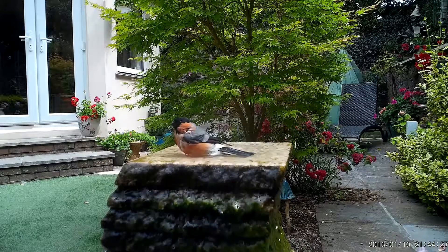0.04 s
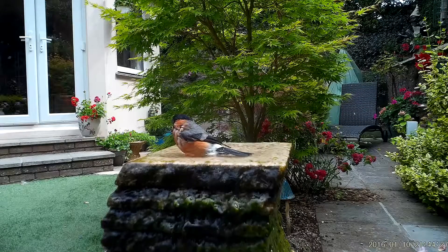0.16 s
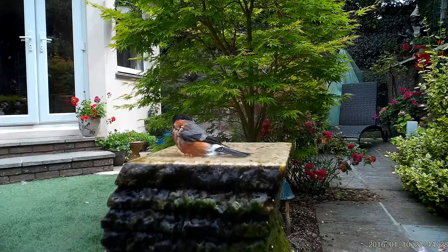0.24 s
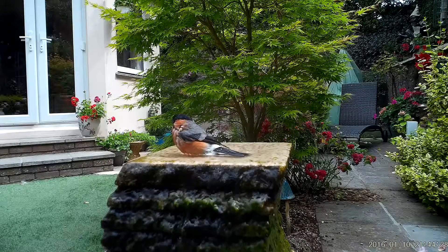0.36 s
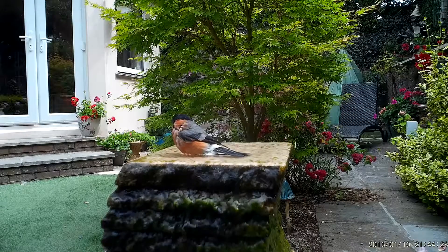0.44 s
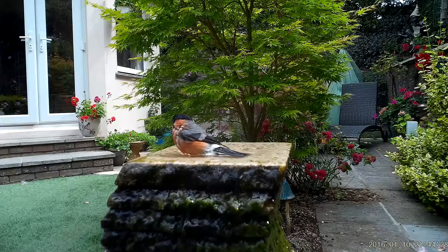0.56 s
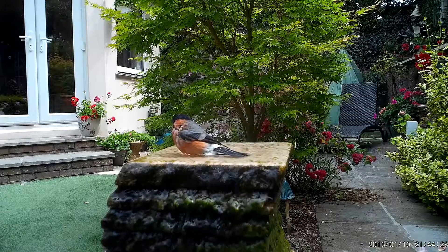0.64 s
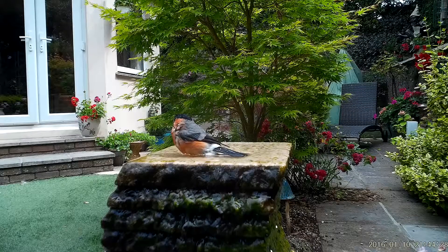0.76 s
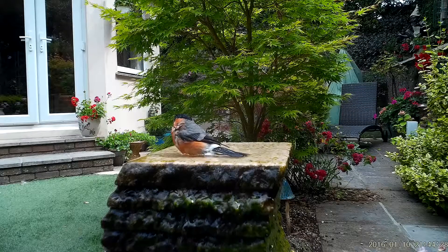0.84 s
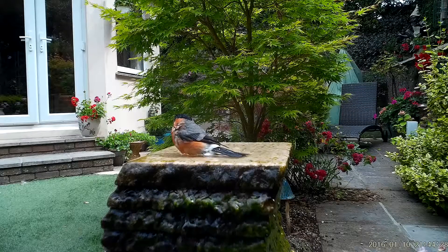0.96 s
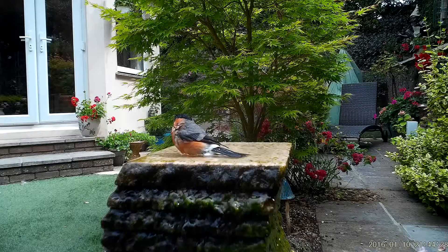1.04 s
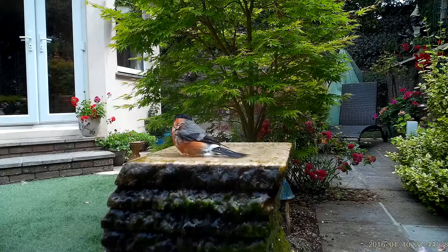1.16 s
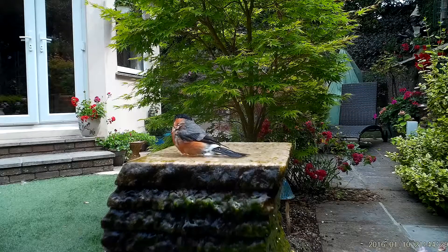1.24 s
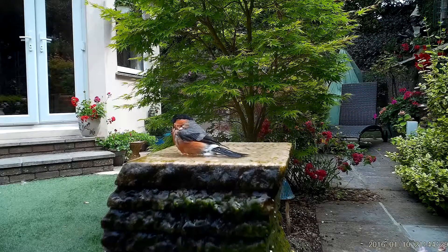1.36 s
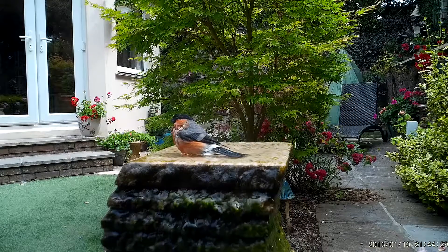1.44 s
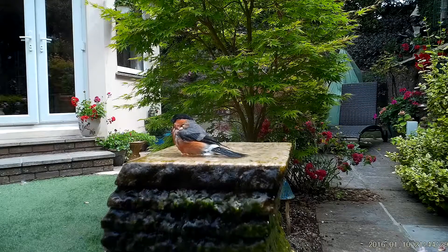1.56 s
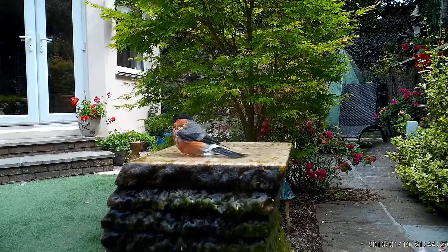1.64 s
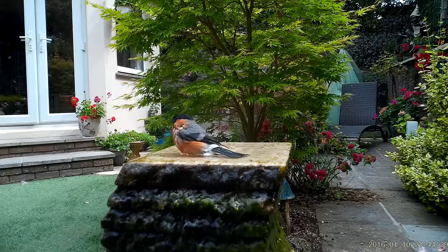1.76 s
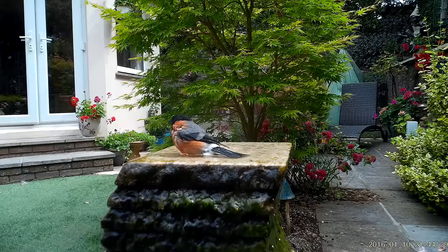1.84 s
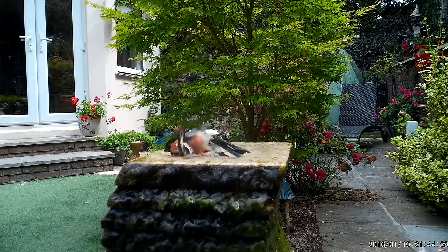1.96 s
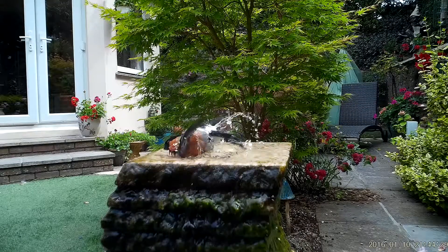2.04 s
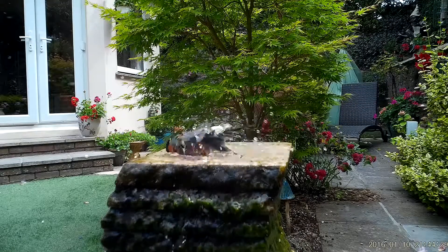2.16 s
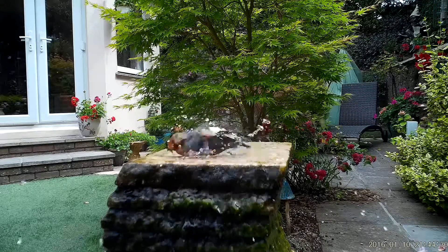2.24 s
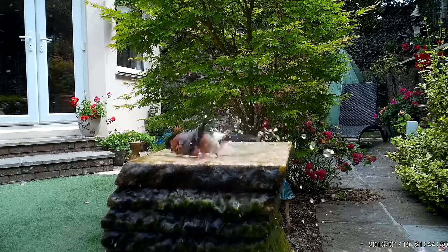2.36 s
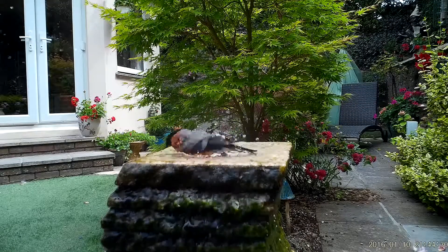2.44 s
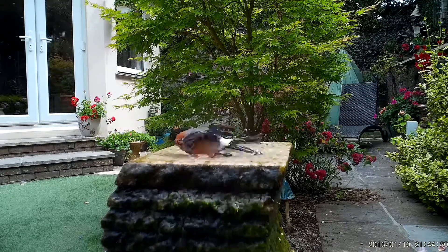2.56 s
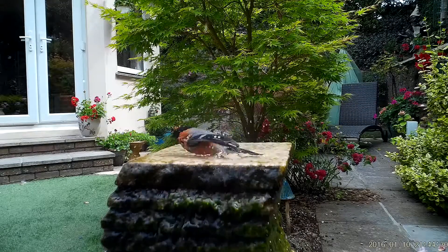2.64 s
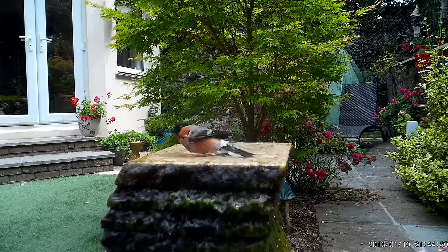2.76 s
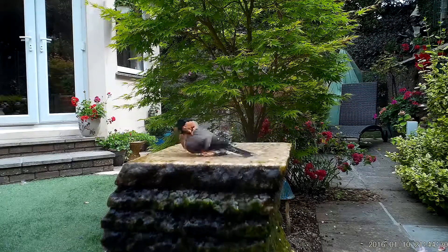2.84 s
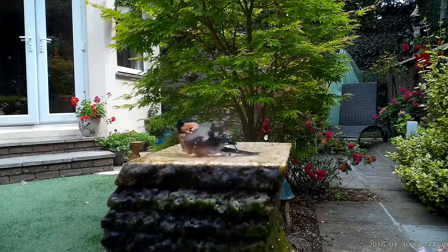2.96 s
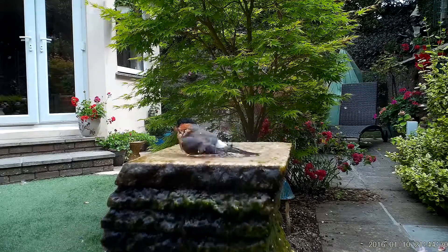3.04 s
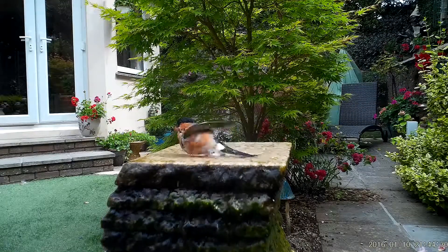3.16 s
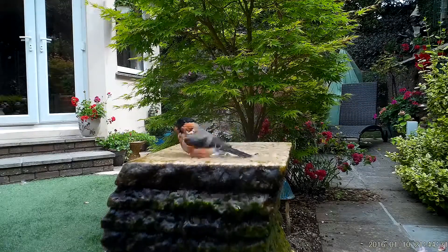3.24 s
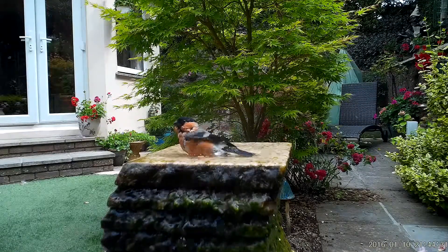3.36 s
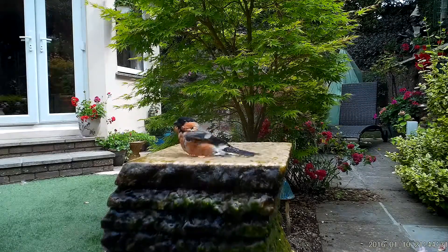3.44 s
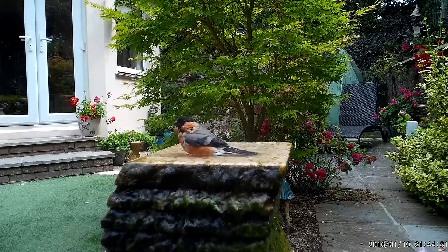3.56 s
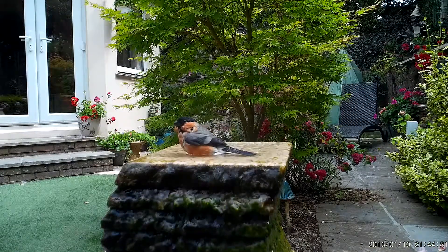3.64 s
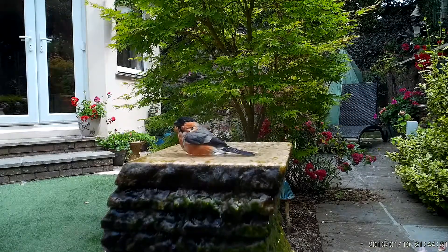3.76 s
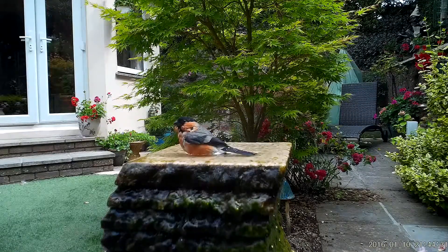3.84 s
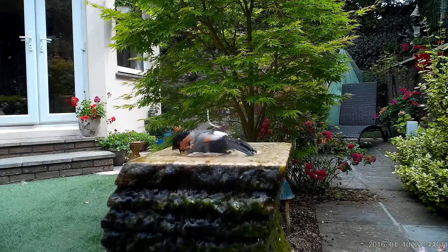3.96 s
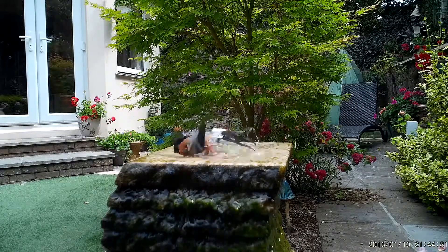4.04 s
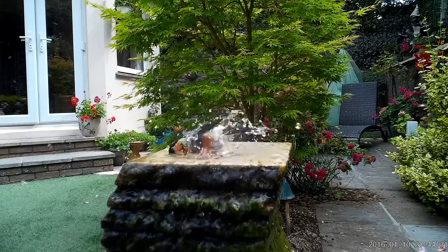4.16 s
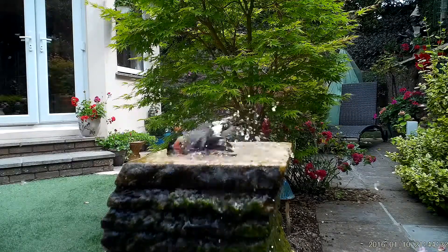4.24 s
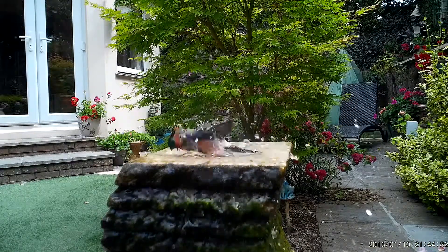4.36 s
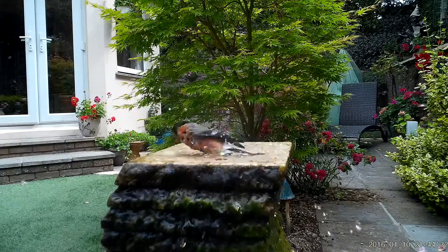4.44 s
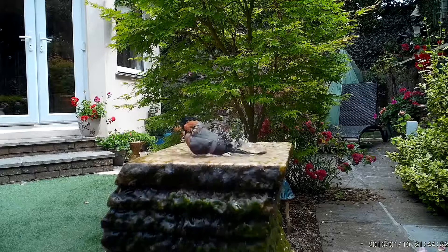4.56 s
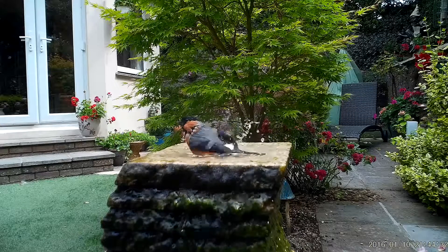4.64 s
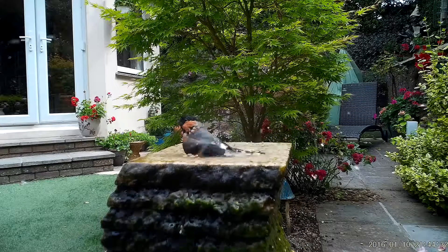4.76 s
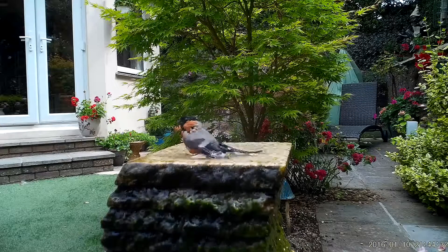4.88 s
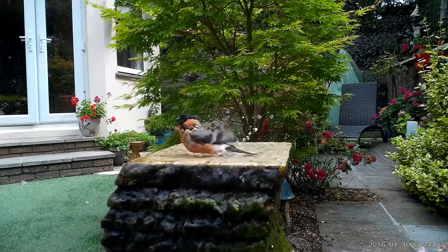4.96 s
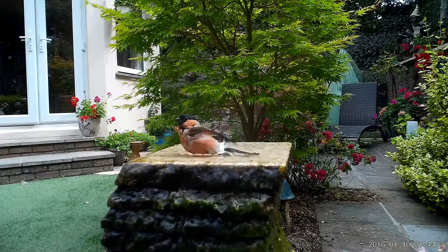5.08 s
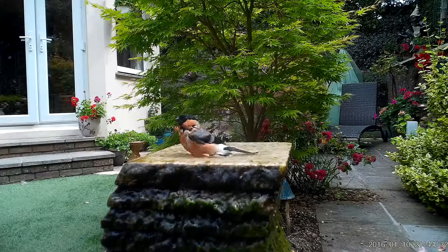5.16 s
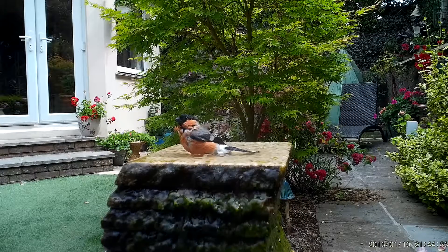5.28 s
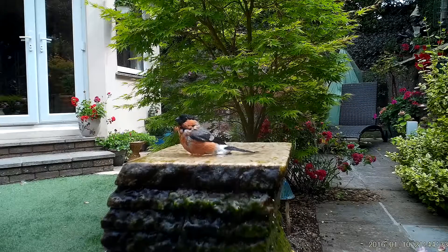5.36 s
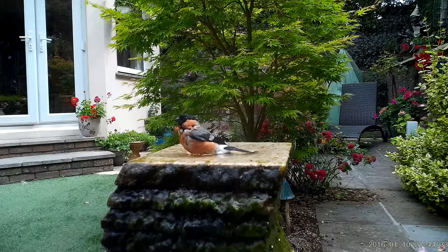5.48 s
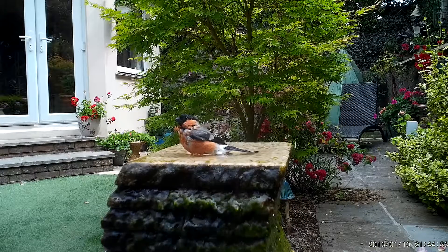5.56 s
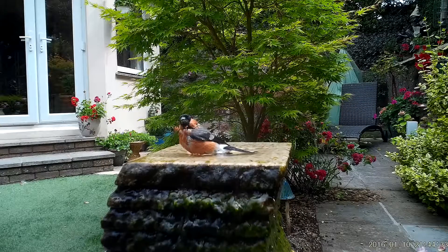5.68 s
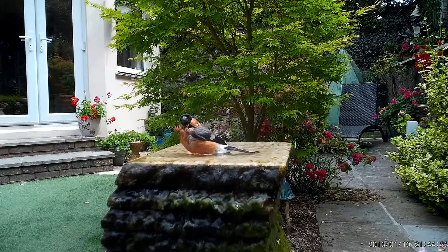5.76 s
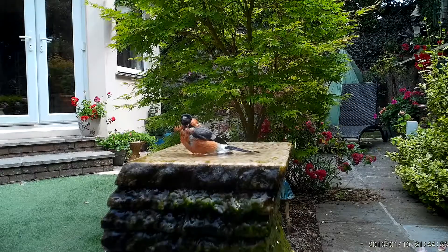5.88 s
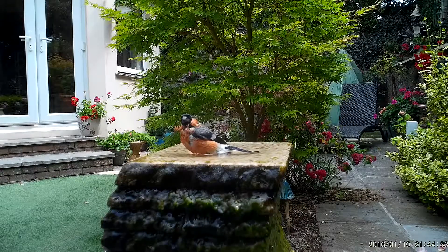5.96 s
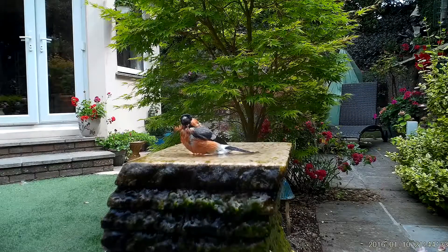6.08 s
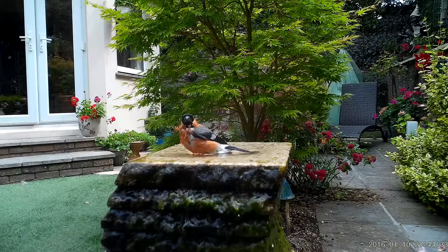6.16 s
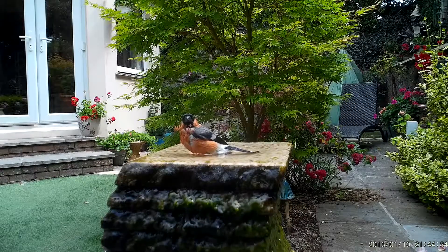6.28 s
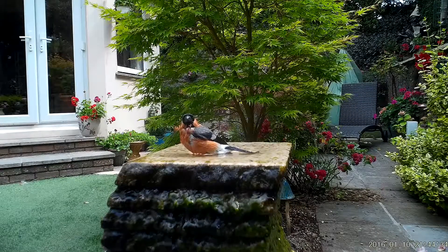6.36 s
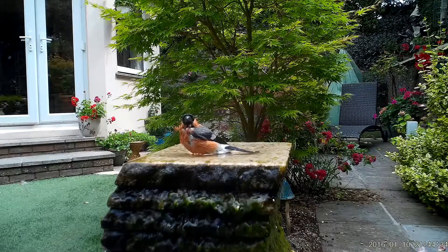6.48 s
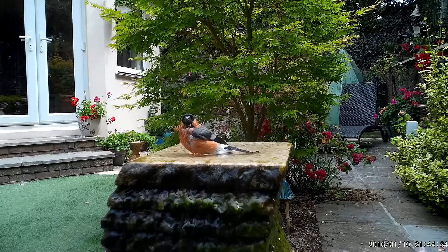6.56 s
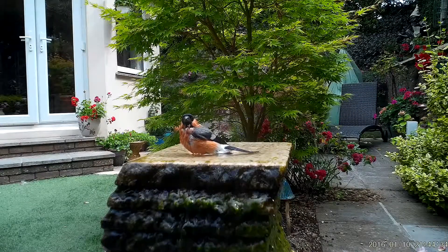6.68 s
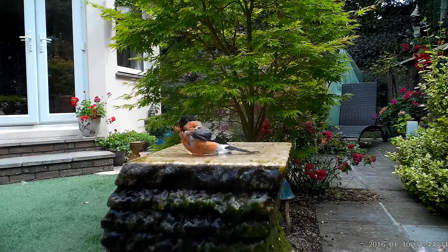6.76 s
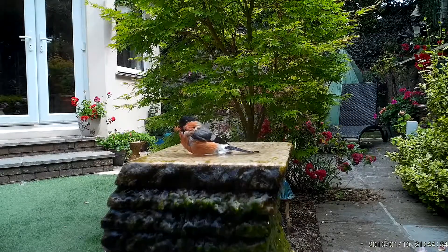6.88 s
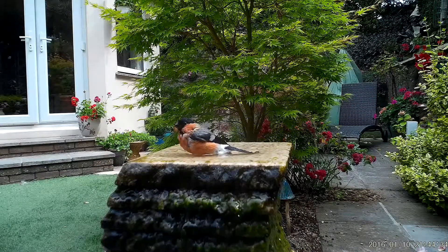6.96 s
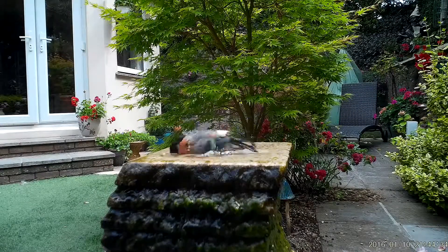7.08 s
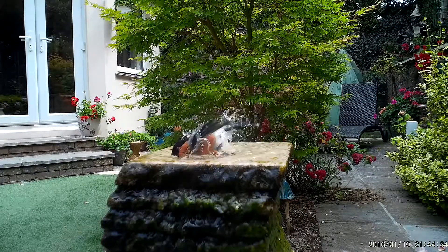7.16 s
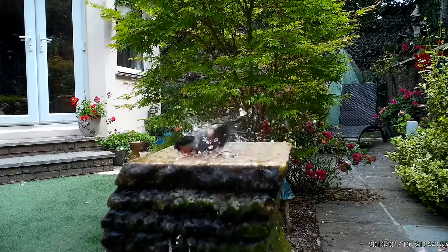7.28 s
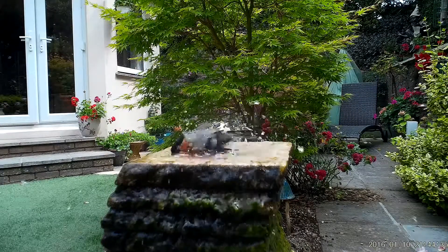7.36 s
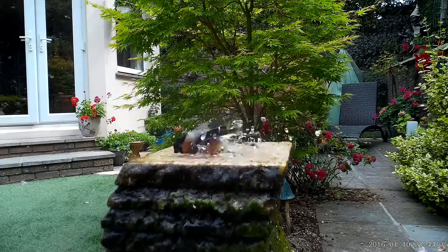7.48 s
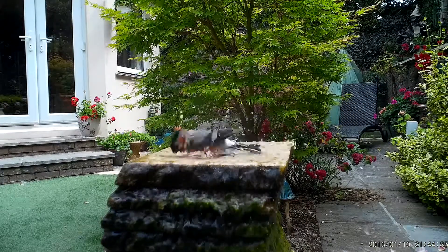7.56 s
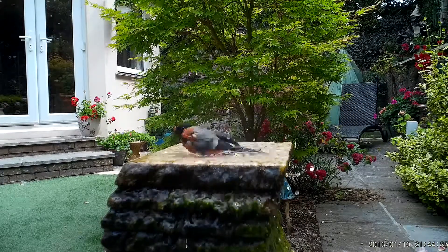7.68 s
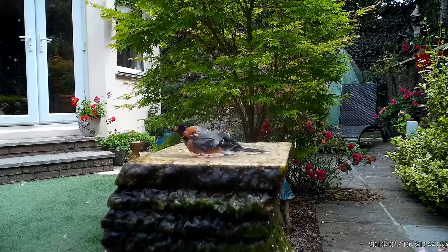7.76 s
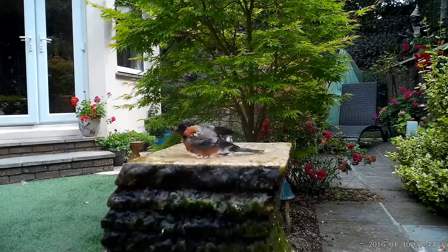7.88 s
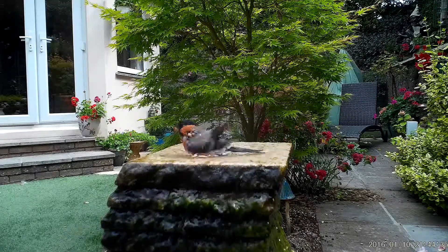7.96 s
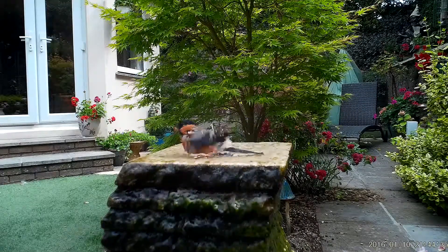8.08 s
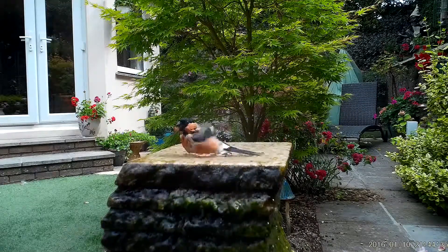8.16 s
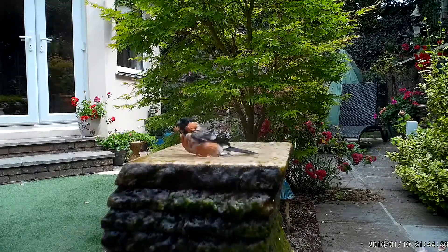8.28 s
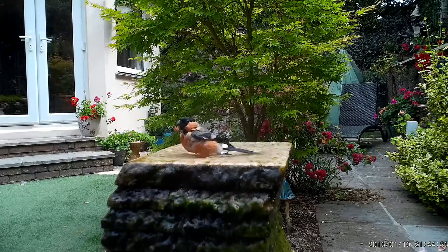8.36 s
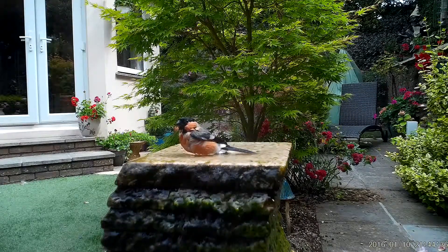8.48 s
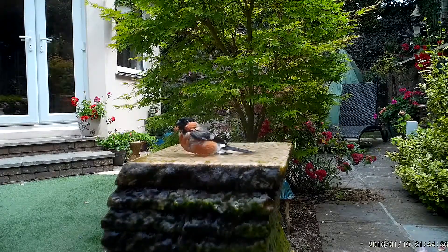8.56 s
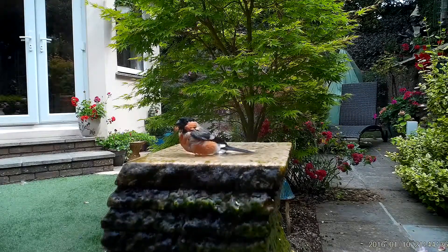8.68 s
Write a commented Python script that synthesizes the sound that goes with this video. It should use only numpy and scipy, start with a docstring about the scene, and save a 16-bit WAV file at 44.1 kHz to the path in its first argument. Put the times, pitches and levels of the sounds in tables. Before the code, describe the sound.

A small bird splashes in bouts in a shallow stone birdbath, drops plinking and trickling, while another bird whistles early on in a quiet garden.

```python
"""A finch bathes on a stone fountain in a garden. From the start drops tick and chirp (filtered clicks for
impacts, gliding damped sines for bubbles), and a wren-like song of wavering whistles runs to about 3 s.
Thin high calls come near 1.4 and 3.8 s. The water is thick while the wings beat, most of all near 2.5, 4.7 and
7.5 s, with a big splat at 7.7 s, and sparse while the overflow trickles. Hollows in the fountain ring as slow
damped sines. Shaped noise makes the hum of the town and a breeze all through."""
import sys
import numpy as np
from scipy import signal
from scipy.fft import rfft, irfft
from scipy.io import wavfile
from scipy.ndimage import uniform_filter1d

SR = 44100
rng = np.random.default_rng(int(sys.argv[2]) if len(sys.argv) > 2 else 0)


def dump(signal):
    """Clip the signal to [-1, 1] and save it as 16-bit WAV at the path in sys.argv[1]."""
    limited = np.clip(np.atleast_2d(signal).T, -1, 1)
    pcm = np.round(limited * 32767).astype(np.int16)
    wavfile.write(sys.argv[1], SR, pcm)


N = 384552

# The clearest drops, each a bubble and the tick of its impact:
# (time [s], bubble peak [dB], bubble pitch [Hz], time to fade by 60 dB [ms], tick level before a boost [dB])
CLEAR_DROPS = [(0.1137, -29, 2960, 29, -51.0), (0.1661, -15.5, 5750, 6.2, -47.0),
               (0.1883, -11.5, 6300, 2.7, -30.5), (0.26, -17, 4730, 4.2, -50.0),
               (0.3549, -27, 3500, 13.0, -53.0), (0.4156, -17.5, 4060, 11, -47),
               (0.429, -16, 4700, 6.1, -50), (0.4974, -28, 6000, 14, -56.0),
               (0.5197, -21, 5750, 4.3, -50.0), (0.534, -33, 2810, 27, -59.0),
               (0.5869, -20, 6720, 8.1, -38), (0.6555, -25, 2050, 14, -39), (0.8518, -22.5, 6720, 9.3, -41),
               (1.1948, -16.5, 3890, 17, -45), (1.2489, -30, 3070, 19, -50),
               (1.2579, -19.5, 6850, 3.7, -43), (1.2723, -23.5, 3400, 17, -36),
               (1.3913, -22.5, 2970, 16.0, -47.5), (1.4547, -22.5, 6260, 11.0, -48.0),
               (1.4656, -21, 4420, 11, -49.0), (1.4916, -15.5, 5850, 7.0, -48),
               (1.574, -20.5, 3760, 13, -46.5), (1.5851, -27, 3700, 13, -55.0),
               (1.6987, -24, 2800, 10.2, -49.5), (1.7645, -20, 7900, 4.8, -29), (1.9575, -16, 6770, 7, -31),
               (2.1581, -26, 3590, 13.0, -46.5), (2.178, -18.5, 6300, 9.2, -44),
               (2.221, -14.5, 5300, 6.2, -45), (2.2402, -13.0, 3960, 6.6, -42.0),
               (2.2793, -28.0, 1880, 29.0, -38), (2.2876, -11, 5320, 3.5, -35),
               (2.3055, -22.5, 2250, 19, -45), (2.319, -18.5, 2950, 18, -29),
               (2.3688, -15.5, 6500, 5.5, -30), (2.4158, -14, 5980, 3.6, -41.5),
               (2.4554, -22, 2250, 16, -46.0), (2.4675, -23, 3480, 13.0, -52.5),
               (2.4696, -22, 7270, 5.5, -41), (2.4829, -22.5, 2080, 30, -43.5),
               (2.5188, -14.5, 5400, 4.3, -38.5), (2.5487, -11.5, 4470, 5.1, -42),
               (2.5786, -34, 1780, 30.0, -51.0), (2.5926, -25, 2900, 17.0, -51.5),
               (2.6245, -21, 2410, 19, -49.0), (2.698, -3.5, 5330, 3, -27.5), (2.7434, -12, 4040, 6.1, -40),
               (2.7812, -16, 3590, 14, -28), (2.8568, -10, 7040, 2.7, -30),
               (2.8687, -19.5, 3700, 7.4, -45.0), (2.8777, -17, 6720, 3.3, -34.5),
               (2.8859, -28.5, 1880, 26, -47.5), (2.9009, -12.5, 6220, 3.6, -26),
               (2.9329, -18, 6720, 6.8, -47), (2.9605, -29, 2480, 23, -49.0),
               (3.0163, -28.5, 2130, 22, -52.0), (3.098, -13.5, 6600, 2.7, -26),
               (3.1077, -16.5, 6500, 7.5, -40), (3.1354, -14.5, 4900, 4.6, -36),
               (3.139, -28.5, 2120, 25.0, -42.5), (3.2037, -18.5, 5200, 4.4, -26),
               (3.2835, -29.5, 2040, 26.0, -58.0), (3.3051, -23.5, 7280, 3, -35),
               (3.3596, -26, 4700, 5.6, -42), (3.4177, -26, 4370, 10.0, -53.5),
               (3.4546, -32, 2160, 38, -45.0), (3.5781, -31, 3600, 22.0, -52),
               (3.5841, -36.5, 1520, 58, -59.5), (3.6504, -32, 2630, 19.0, -60.0),
               (3.664, -36, 1810, 25, -55.5), (3.737, -32, 3570, 13.0, -51.0),
               (3.7804, -19, 6460, 6.4, -53), (3.7971, -21, 5980, 12.0, -53),
               (3.9298, -38.0, 1870, 47, -65), (4.0066, -26, 6800, 10.0, -53),
               (4.0148, -26, 6130, 6.2, -49.5), (4.029, -33, 2320, 21.0, -55.5),
               (4.0523, -21.5, 5570, 13.0, -52), (4.1367, -21, 7270, 2.9, -50),
               (4.178, -27, 6460, 5.9, -52), (4.2379, -27, 5530, 7.7, -45.5), (4.243, -31.0, 3100, 29, -46),
               (4.2611, -18.5, 5150, 5.1, -38), (4.3337, -28.5, 2120, 40.0, -50.0),
               (4.3354, -21.0, 4920, 8.8, -44.0), (4.3478, -21, 2800, 15, -44.0),
               (4.3643, -14.5, 6300, 7.2, -44.5), (4.422, -20.5, 3770, 11, -38),
               (4.4434, -21, 6360, 7.4, -44.0), (4.5053, -23, 4700, 5.1, -49.0),
               (4.5152, -24, 6220, 6.7, -49.0), (4.5717, -27, 3590, 20, -47.5),
               (4.5936, -22.5, 2830, 21, -38), (4.622, -27.5, 2840, 29.0, -41),
               (4.6354, -16, 5980, 3.5, -25.5), (4.7507, -29, 1850, 26, -60.5),
               (4.7655, -17.5, 6400, 4.6, -49.0), (4.9103, -28, 5030, 8.8, -53.5),
               (5.0727, -29.5, 4730, 8.3, -50.0), (5.1653, -27, 6400, 9.5, -52.0),
               (5.2703, -30, 2250, 19, -60.0), (5.2878, -32.5, 1650, 32, -63), (5.3337, -25, 6100, 10, -55),
               (5.3376, -31, 1700, 32, -56.0), (5.4212, -19, 7860, 2.2, -54), (5.4925, -27, 3870, 7.1, -41),
               (5.5203, -34, 3520, 21, -54.5), (5.5973, -26.5, 5930, 12.0, -55.0),
               (5.6317, -27.5, 4530, 9.7, -51.0), (5.653, -24.5, 6990, 11, -51),
               (5.7336, -26, 5700, 9.2, -56.5), (5.8412, -30, 6300, 9.6, -60.5),
               (5.8493, -24, 4370, 6.7, -54.5), (5.85, -36.5, 1270, 49, -57.0), (5.897, -31, 2700, 18, -55),
               (6.0917, -23.5, 6050, 5.8, -54.5), (6.163, -30, 3540, 12, -54),
               (6.1764, -25.5, 3580, 9.4, -54.5), (6.2462, -24.5, 5800, 6, -58.0),
               (6.335, -26.5, 6500, 6.4, -55), (6.4553, -26, 6400, 6.4, -57.0),
               (6.5237, -21.5, 6460, 7.7, -54.0), (6.5633, -29, 2880, 17.0, -62.0),
               (6.5983, -31, 3890, 12.0, -59.0), (6.616, -23.5, 5900, 4.3, -54.5),
               (6.731, -25.5, 4650, 7.8, -57), (6.7755, -22.5, 6600, 4.9, -53.5),
               (6.8352, -25.5, 2870, 23, -57.0), (6.8418, -29, 2640, 22, -53.0),
               (6.8783, -28, 3610, 15, -46), (6.9325, -27, 4280, 18.0, -57.5),
               (6.9392, -20.5, 6600, 3.6, -53.0), (7.0038, -14, 6500, 3.8, -49),
               (7.0704, -26.5, 4000, 12, -50.0), (7.085, -30, 3480, 15, -55.0),
               (7.1378, -28.5, 3470, 14, -58.5), (7.145, -30.5, 1980, 41, -54.5),
               (7.1518, -21, 7270, 2.3, -48), (7.1717, -26, 4250, 18.0, -48),
               (7.2174, -27.5, 2250, 14, -49), (7.2384, -20.5, 3780, 10, -51.0),
               (7.3032, -9, 5900, 2.6, -23.5), (7.338, -14, 6720, 4.6, -48),
               (7.3498, -26.5, 3200, 25.0, -41), (7.4431, -24.5, 2340, 22.0, -40.0),
               (7.4717, -23, 6600, 5.5, -47), (7.484, -25, 3240, 25.0, -51.0),
               (7.5341, -15, 3200, 8.4, -34), (7.549, -23, 3890, 20.0, -41), (7.575, -31.5, 1510, 44, -38),
               (7.6993, -20, 3700, 12.0, -39), (7.7194, -18.0, 3890, 7.1, -46.0),
               (7.73, -17, 6700, 3.5, -32), (7.7579, -23, 6400, 6.4, -47), (7.82, -23, 7270, 5.5, -47),
               (7.8307, -20, 5980, 11, -54.0), (7.852, -30.5, 2390, 41, -54.5),
               (7.9107, -16, 6060, 12.0, -48), (7.9199, -22, 6200, 7, -48), (7.9415, -18, 5900, 4.2, -49.0),
               (7.9751, -24, 4920, 8.8, -43.0), (8.0634, -29, 6500, 5.3, -52),
               (8.0944, -18.5, 4550, 4.8, -35), (8.144, -25, 5000, 3, -29), (8.188, -23, 3460, 11, -51.5),
               (8.3929, -26.5, 3460, 8.1, -47.0), (8.4815, -27, 4550, 8.6, -55.5),
               (8.5291, -18, 6900, 3, -49), (8.6222, -21.5, 6060, 7.0, -46), (8.6336, -25.5, 3900, 18, -53)]
# One big splat whose pitch sweeps up: (time [s], level [dB], start pitch [Hz], end pitch [Hz], length [s])
BIG_SPLAT = (7.6782, -2, 1500, 10000, .0036)
# Drops that ring the hollow, and a few low plops: (time [s], peak [dB], pitch [Hz])
HOLLOW_DROPS = [(0.35, -38, 1060), (1.141, -39.5, 896), (1.438, -47, 910), (1.559, -38, 923),
                (1.614, -36.5, 1030), (1.683, -39, 922), (2.328, -44, 1100), (2.45, -45.5, 930),
                (2.745, -42.5, 910), (3.096, -45, 880), (3.203, -44, 1174), (3.435, -36.5, 897),
                (4.004, -45, 906), (4.307, -46, 900), (4.602, -41, 1020), (4.73, -46, 904),
                (4.801, -40.5, 922), (5.438, -45, 1196), (5.937, -44, 1000), (6.359, -45, 883),
                (6.44, -42, 910), (7.268, -31, 915), (7.302, -34, 676), (7.332, -36.5, 910),
                (7.39, -43, 870), (7.415, -34.5, 890), (7.613, -39.5, 920), (7.779, -41, 1155),
                (7.822, -36.5, 928), (8.018, -41.5, 964), (8.163, -40, 908), (8.253, -40, 916),
                (8.656, -39, 934)]
# How hard the water is stirred: (time [s], level of the small drops before a boost [dB])
WATER_STIR = [(0.0, -49.5), (0.92, -56), (1.34, -51), (1.65, -53), (2.5, -46), (3.06, -47), (3.47, -55.5),
              (4.19, -58), (4.26, -50), (4.66, -46.5), (4.83, -55), (5.29, -55), (5.8, -57), (6.07, -59),
              (6.94, -57), (7.24, -54), (7.44, -43), (7.58, -44), (7.66, -50), (7.72, -45), (7.81, -49),
              (7.96, -48.5), (8.28, -56), (8.72, -60)]
# Colour of the small drops: (frequency [Hz], relative level [dB])
SPRAY_COLOUR = [(350, -41), (600, -21.5), (727, -11), (1230, -7), (1610, -7.5), (2990, -0.5), (5400, -2),
                (6370, 2.5), (11200, -21.5), (16000, -37)]
# Song notes: (start [s], end [s], start pitch [Hz], end pitch [Hz],
# level before waver, fade and mixing [dB], width of the buzz [Hz])
SONG_NOTES = [ (.07, .125, 5080, 5180, -39.5, 44), (.14, .24, 4170, 4195, -40, 31),
              (.24, .28, 5800, 6100, -39.5, 270), (.28, .37, 6460, 6480, -41.5, 81),
              (.57, .61, 5560, 5290, -33, 330), (.61, .70, 5530, 5400, -34.5, 20),
              (.81, .93, 4260, 4240, -44.5, 24), (.81, .84, 5170, 4570, -39, 120),
              (.84, .885, 5150, 5080, -48, 150), (.915, .945, 5360, 4410, -41, 180),
              (.995, 1.025, 5250, 4540, -38.5, 180), (1.065, 1.19, 5597, 5690, -30.5, 23),
              (1.14, 1.25, 5830, 5790, -37, 210), (1.32, 1.43, 4880, 4870, -43.5, 165),
              (1.35, 1.39, 5250, 5250, -36.5, 190), (1.575, 1.66, 5890, 5920, -29.5, 19),
              (1.655, 1.69, 5910, 5220, -29, 51), (1.70, 1.735, 5910, 5400, -40.5, 92),
              (1.72, 1.76, 4230, 4400, -37, 120), (1.74, 1.92, 5880, 6130, -39.5, 580),
              (1.83, 1.875, 5030, 4440, -36, 68), (1.88, 1.92, 5000, 4700, -38, 610),
              (2.07, 2.095, 4170, 4900, -38, 53), (1.93, 2.03, 5240, 5180, -34.5, 180),
              (2.11, 2.15, 6500, 6700, -51, 220), (2.345, 2.39, 5430, 5030, -28.5, 43),
              (2.385, 2.455, 5120, 4930, -36.5, 50), (2.55, 2.60, 5770, 5730, -38, 33),
              (2.65, 2.75, 5550, 5880, -34, 310), (2.78, 2.85, 5630, 5740, -41, 65), ]
# Thin high calls: (start [s], end [s], start pitch [Hz], end pitch [Hz],
# level before waver, fade and mixing [dB], width of the buzz [Hz])
THIN_CALLS = [(1.375, 1.42, 8000, 8100, -38, 270), (1.42, 1.46, 8200, 8200, -43, 39),
              (1.40, 1.47, 8700, 7700, -47, 150), (3.75, 3.81, 7900, 8500, -46, 290),
              (3.815, 3.87, 8200, 8200, -49, 30), (3.80, 3.86, 8700, 8700, -51, 150)]
# Colour of the town's hum: (frequency [Hz], relative level [dB])
TOWN_COLOUR = [(12, -32), (20, 6), (65, -1), (177, -1), (802, -19), (923, -0.5), (1860, -12), (2670, -6.5),
               (5080, -16.5), (6360, -17.5), (9140, -22.5), (13900, -22), (16000, -63)]
# Wind and traffic: (time [s], wind buffet [dB], low traffic [dB], traffic hiss [dB])
BREEZE_LEVELS = [(0.0, -55.5, -57.5, -58.5), (0.56, -61, -64, -59), (0.82, -46.5, -64, -59),
                 (1.26, -62, -59.5, -56.5), (2.53, -53.5, -55.5, -56), (3.52, -57.5, -61.5, -63),
                 (4.39, -56, -55.5, -61), (6.0, -66.5, -68, -66), (6.7, -64, -63, -64),
                 (7.3, -63, -57, -58), (7.9, -64, -61, -62), (8.72, -69, -67.5, -64)]

# below STEADY_HZ a bubble's pitch climbs during its ring, by a share of itself per octave
STEADY_HZ, CLIMB_PER_OCTAVE, CLIMB_SCATTER = 5020, 0.565, 0.41
# drops near the main hollow's pitch ring longer than other plops
HOLLOW_HZ, PLINK_MS, PLOP_MS = 916, 110, 59
ECHO_BLUR_S = 0.0055  # smoothing of the random flicker that blurs the song's echoes
TOWN_DB = -58
HISS_DB, EDGE_HZ = -75.5, 15900  # microphone self-noise, upper limit of the treble


def drops():
    """Each drop ticks on the surface and then its bubble rings; large, low bubbles glide up the most."""
    rings, ticks = np.zeros(N), np.zeros(N)
    glides = rng.uniform(-1, 1, len(CLEAR_DROPS))
    for (s, db, hz, t60, tick_db), glide in zip(CLEAR_DROPS, glides):
        octaves_below = max(np.log2(STEADY_HZ / hz), 0)
        rise = hz * CLIMB_PER_OCTAVE * octaves_below * (1 + CLIMB_SCATTER * glide)
        add(rings, s, gain_of(db) * bubble(hz, rise / t60, 0.3 + 0.028 * t60, t60))
        add(ticks, s, gain_of([tick_db]))  # a single-sample click
    s, db = BIG_SPLAT[:2]
    add(rings, s, gain_of(db) * splat())
    body = signal.butter(2, [700, 8500], "bandpass", fs=SR, output="sos")
    soft_top = signal.butter(2, 12000, fs=SR, output="sos")
    ticks = signal.sosfilt(np.vstack([body, soft_top]), ticks)
    return rings + gain_of(20) * ticks  # the tick's body stands above its treble


def splat():
    """A short sine that sweeps upward faster and faster, swelling late."""
    _, _, lo_hz, hi_hz, length = BIG_SPLAT
    u = np.linspace(0, 1, round(length * SR))
    pitch = lo_hz + (hi_hz - lo_hz) * u ** 1.95
    return np.sin(np.pi * u ** 2.14) ** 4 * np.sin(2 * np.pi * np.cumsum(pitch) / SR)


def bubble(hz, climb, swell, t60):
    """A damped sine whose pitch glides as the bubble nears the surface; times in ms, climb in Hz per ms."""
    t = np.arange(round((swell + t60) * SR / 1000) + 20) * 1000 / SR
    pitch = np.clip(hz + climb * t, 300, .45 * SR)
    rise = np.sin(np.pi / 2 * np.clip(t / swell, 0, 1)) ** 2
    decay = gain_of(-60 * np.maximum(t - swell, 0) / t60)
    return np.sin(2 * np.pi * np.cumsum(pitch) / SR) * rise * decay


def spray():
    """Countless small drops that land in clumps; bigger bubbles ring lower and longer."""
    stir_db = curve(WATER_STIR, order=1)
    thick = gain_of(.35 * (stir_db + 58))  # stirred water throws more drops as well as louder ones
    drift = uniform_filter1d(uniform_filter1d(rng.standard_normal(N), 450), 450)
    clumps = gain_of(4.0 * evened(drift))
    rings, patter = np.zeros(N), np.zeros(N)

    at, sizes = scatter(thick * clumps, 4.3, count=3600)
    for n, size, (pitch, cycles, glide, onset) in zip(at, sizes, rng.random((len(at), 4))):
        hz = 1000 * 11.0 ** pitch
        ring_ms = 1000 * (14 + 45 * cycles) / hz
        climb = hz * (1.24 * glide - .1) / ring_ms
        swell_ms = ring_ms * (0.0083 + 0.28 * onset)
        ring = bubble(hz, climb, swell_ms, ring_ms)
        add(rings, n / SR, size * np.sqrt(hz / ring_ms) * ring)

    at, sizes = scatter(thick * clumps, 3.9, count=900)
    patter[at] = sizes  # impacts that trap no air
    fizz = thick ** 1.1 * np.sqrt(clumps) * rng.standard_normal(N)  # droplets too fine to hear singly
    heard_singly = (evened(rings) + gain_of(-4.5) * evened(patter)) / np.sqrt(thick)
    mix = heard_singly + gain_of(-10.5) * fizz
    return gain_of(stir_db + 11.5) * evened(coloured(mix, SPRAY_COLOUR))


def scatter(chance, size_db, count):
    """Picks count random moments, likelier where chance is high, with sizes mostly small."""
    draws = rng.random((count, 2))
    at = np.searchsorted(np.cumsum(chance) / chance.sum(), draws[:, 0]).clip(0, N - 1)
    return at, gain_of(size_db * np.minimum(-np.log(draws[:, 1] + 1e-9), 3))


def hollow():
    """Air pockets under the slab ring when a drop falls in; the trickle taps them faintly at random."""
    out = np.zeros(N)
    for s, db, hz in HOLLOW_DROPS:
        ring_ms = PLINK_MS if abs(hz - HOLLOW_HZ) < 45 else PLOP_MS
        add(out, s, gain_of(db) * bubble(hz, 0.54, 2.6, ring_ms))
    at, sizes = scatter(np.ones(N), 4.0, count=200)
    for n, size, (pocket, detune) in zip(at, sizes, rng.random((len(at), 2))):
        hz = (905 if pocket < .6 else 1160) * (1 + .05 * detune)  # one of two pockets
        add(out, n / SR, gain_of(-55.5) * size * bubble(hz, 0.21, 5.8, 66))
    return out


def birds(notes):
    """Near-sine whistles that waver in level and fade; buzzy notes shake their pitch quickly."""
    out = np.zeros(N)
    shake, waver = smooth_noise(350), smooth_noise(700)
    for start, end, from_hz, to_hz, db, buzz_hz in notes:
        span = slice(round(start * SR), round(end * SR))
        u = np.linspace(0, 1, span.stop - span.start)
        pitch = from_hz + (to_hz - from_hz) * u + .5 * buzz_hz * shake[span]
        whistle = np.sqrt(2) * np.sin(2 * np.pi * np.cumsum(pitch) / SR)
        level = gain_of(db + 4.1 * waver[span] - 6.8 * u)
        add(out, start, level * whistle * signal.windows.tukey(len(u), .5))
    return out


def garden():
    """Steady hum of the town, swelling traffic and wind buffeting the microphone, all from noise."""
    hum = gain_of(TOWN_DB) * evened(coloured(rng.standard_normal(N), TOWN_COLOUR))
    hum += gain_of(-65.0) * band(63, 96)
    wind = gain_of(curve(BREEZE_LEVELS, order=1)) * band(26.4, 49.7)
    low_traffic = gain_of(curve(BREEZE_LEVELS, order=2)) * band(132.4, 228)
    traffic_hiss = gain_of(curve(BREEZE_LEVELS, order=3)) * band(177, 680)
    return hum + wind + low_traffic + traffic_hiss


def echoes(x, t60, start, count=4):
    """Diffuse reflections: successive moments of sound take turns among several decaying noise tails."""
    t = np.arange(round(t60 * SR)) / SR
    turn = np.arange(N) / SR * 23  # 23 turns a second
    out = np.zeros(N)
    for k in range(count):
        tail = rng.standard_normal(len(t)) * gain_of(-60 * t / t60) * (t > start)
        window = np.cos(np.pi / 2 * np.clip((turn - k) % count - count / 2, -1, 1))  # squares sum to 1
        out += signal.oaconvolve(x * window, tail / np.linalg.norm(tail))[:N]
    return out


def band(lo_hz, hi_hz):
    """Noise between two frequencies, at rms 1."""
    sos = signal.butter(2, [lo_hz, hi_hz], "bandpass", fs=SR, output="sos")
    return evened(signal.sosfilt(sos, rng.standard_normal(N)))


def smooth_noise(size):
    """Random wandering: noise averaged over a window of size samples, at rms 1."""
    return evened(signal.oaconvolve(rng.standard_normal(N), np.hanning(size), "same"))


def coloured(x, points):
    """Filters x by a spectrum of (Hz, dB) points."""
    hz, db = np.transpose(points)
    bins = np.fft.rfftfreq(len(x), 1 / SR)
    gain = gain_of(np.interp(np.log(bins + 1), np.log(hz + 1), db))
    return irfft(rfft(x) * gain, len(x))


def curve(rows, order):
    """One column of a table, sample by sample."""
    table = np.transpose(rows)
    return np.interp(np.arange(N) / SR, table[0], table[order])


def add(mix, s, sound):
    """Mixes a sound in at time s."""
    part = mix[max(round(s * SR), 0):][:len(sound)]
    part += sound[:len(part)]


def gain_of(db):
    """Decibels to amplitude."""
    return 10 ** (np.asarray(db) / 20)


def evened(x):
    """Scales to rms 1."""
    return x / np.sqrt(np.mean(x ** 2) + 1e-20)


def scene():
    """Water close by with short reflections off stone and wall; birds farther off and wetter."""
    water = drops() + spray() + hollow()
    song, calls = birds(SONG_NOTES), birds(THIN_CALLS)
    flicker = evened(1 + 0.52 * smooth_noise(round(ECHO_BLUR_S * SR)))
    mix = water + gain_of(-10.5) * echoes(water, 0.03, 0.00141)
    mix += gain_of(-17.5) * echoes(water, 0.44, 0.013, count=2)
    mix += gain_of(-0.5) * song + gain_of(1.5) * echoes(song * flicker, 0.39, 0.0017)
    mix += gain_of(2.0) * calls + gain_of(-4.0) * echoes(calls, 0.46, 0.0022)
    return (mix + garden())[None]


def record(dry):
    """Adds microphone hiss, then cuts the treble above the upper limit."""
    noisy = dry + gain_of(HISS_DB) * rng.standard_normal(dry.shape)
    lowpass = signal.firwin(255, EDGE_HZ, window=("kaiser", 9), fs=SR)
    return signal.oaconvolve(noisy, lowpass[None], "same")


dry = scene()
out = record(dry)
dump(out)
```